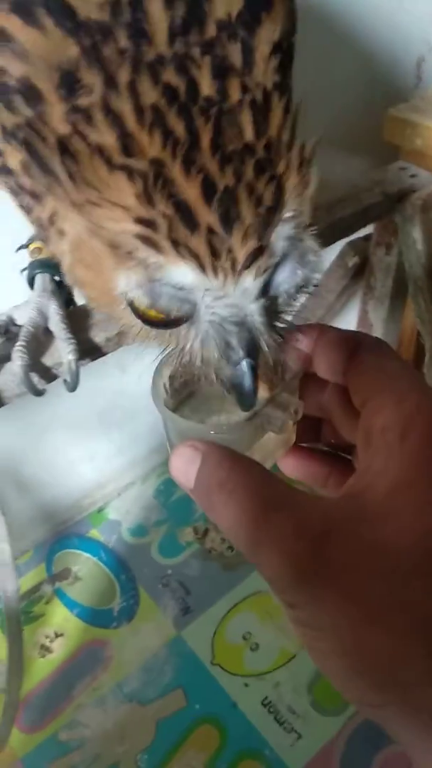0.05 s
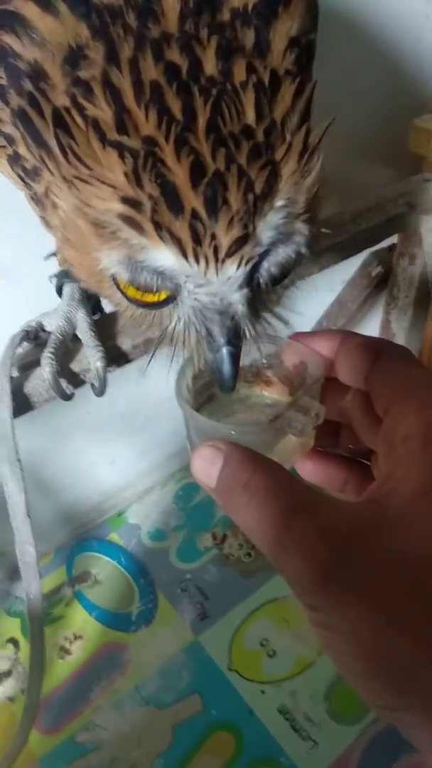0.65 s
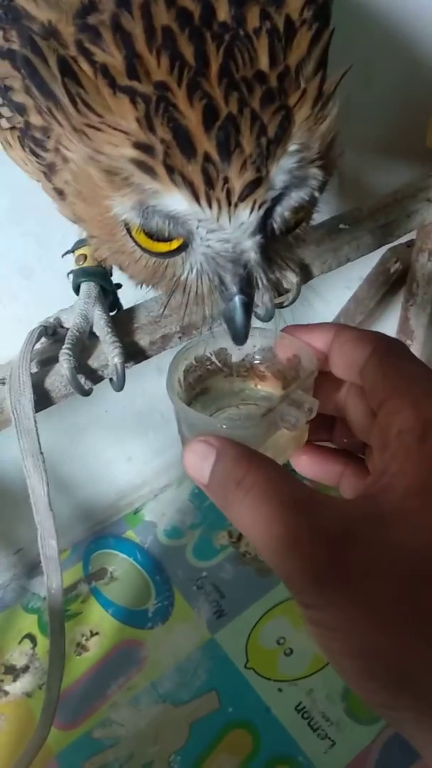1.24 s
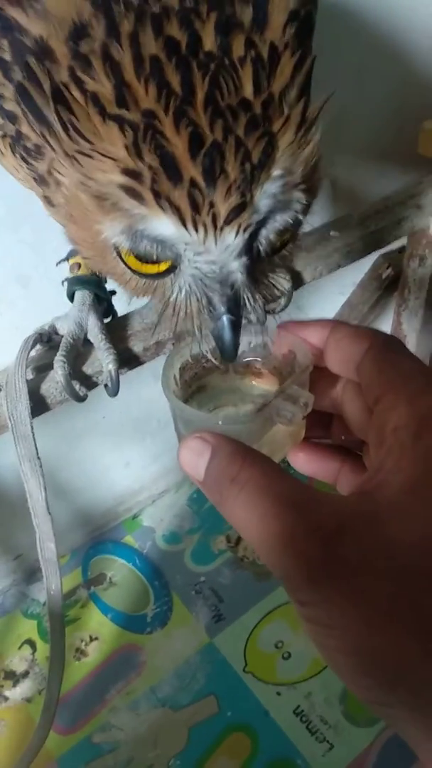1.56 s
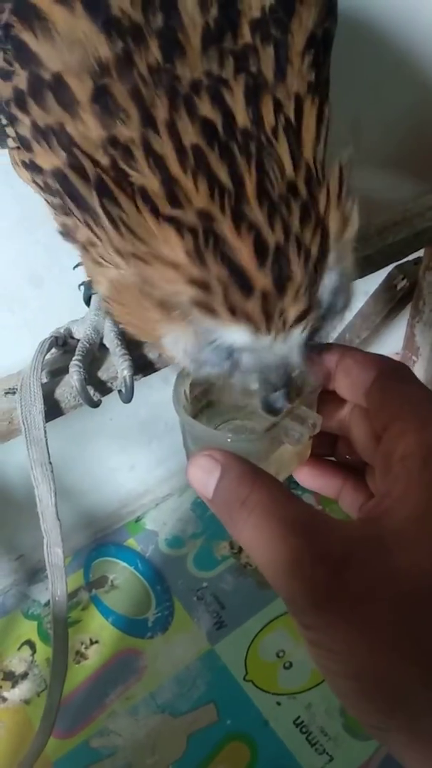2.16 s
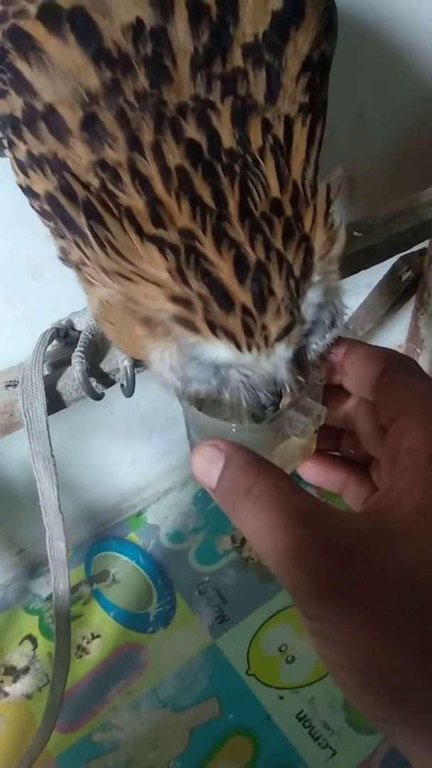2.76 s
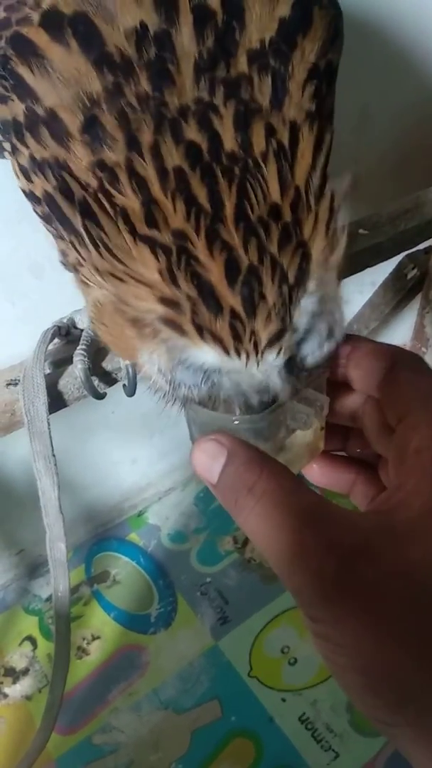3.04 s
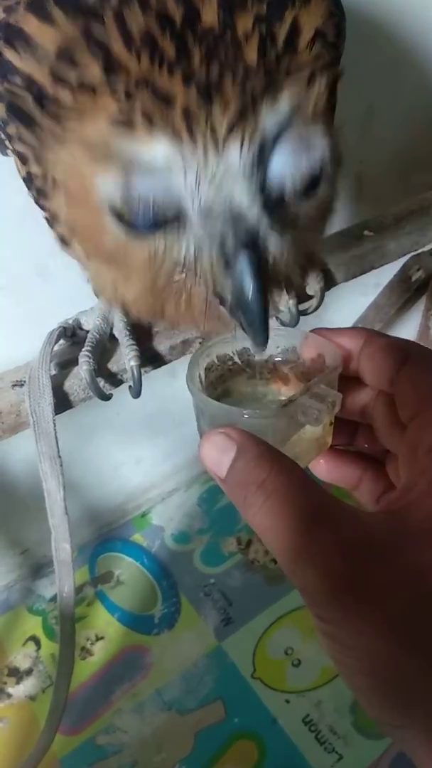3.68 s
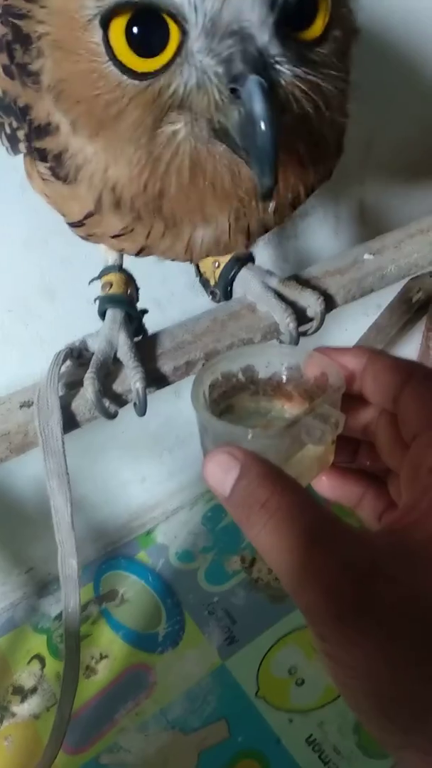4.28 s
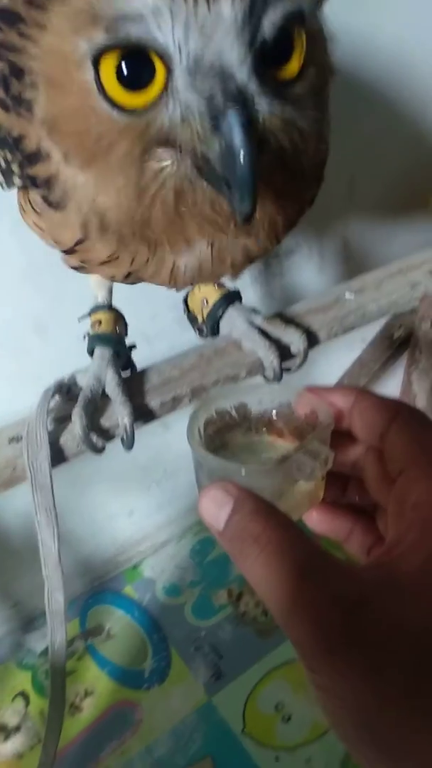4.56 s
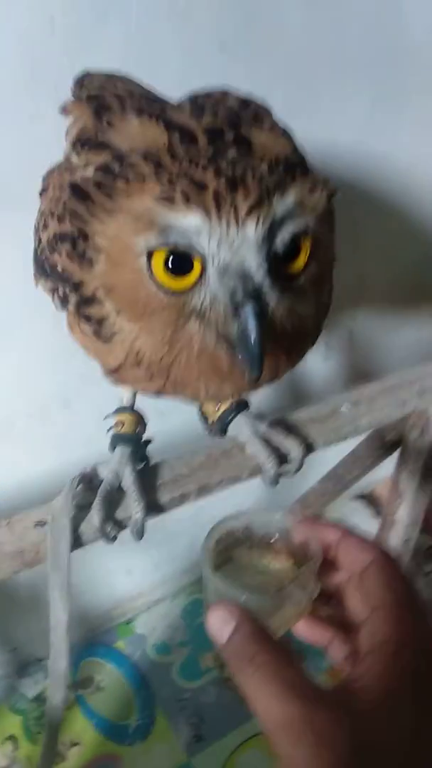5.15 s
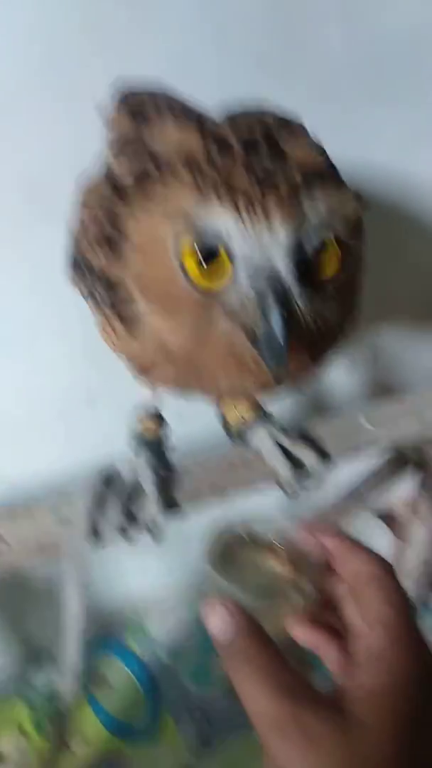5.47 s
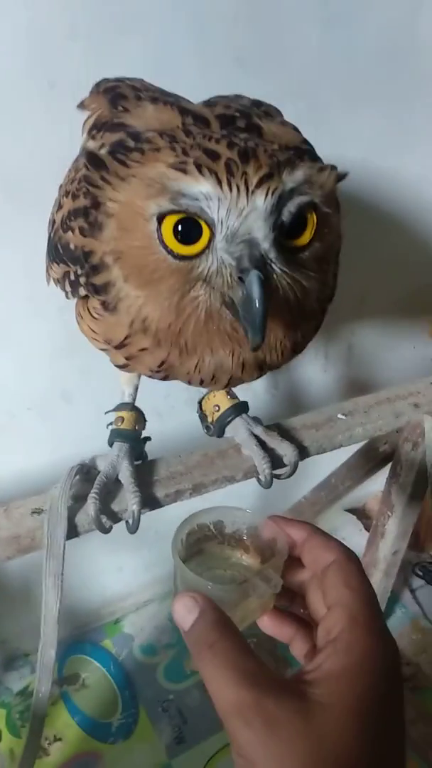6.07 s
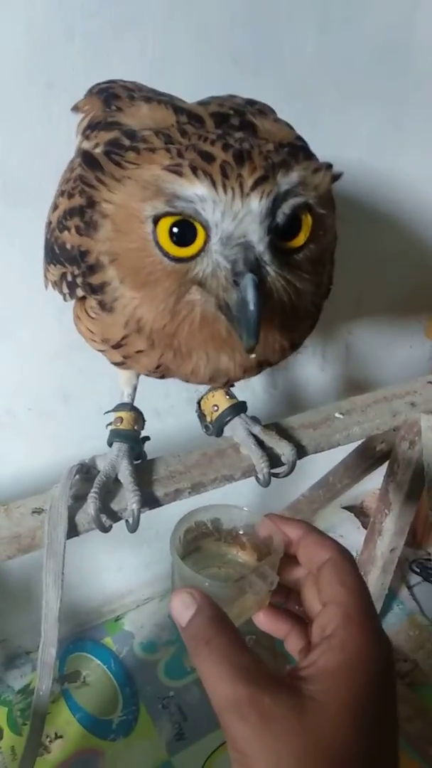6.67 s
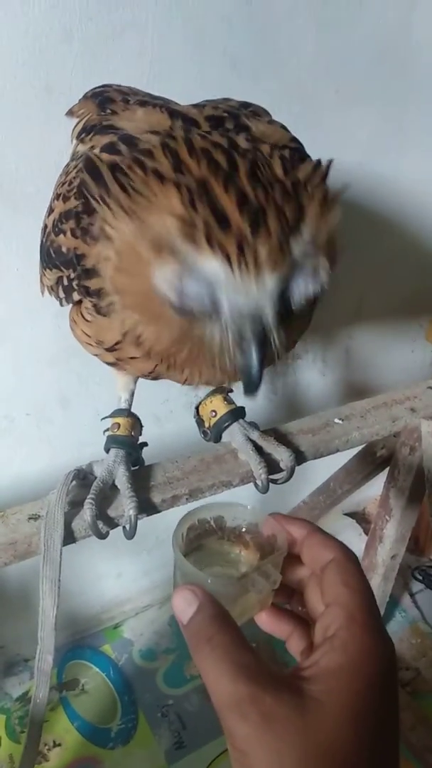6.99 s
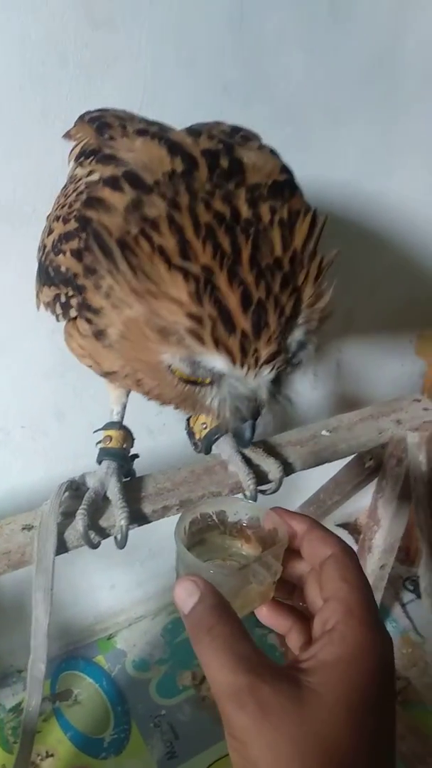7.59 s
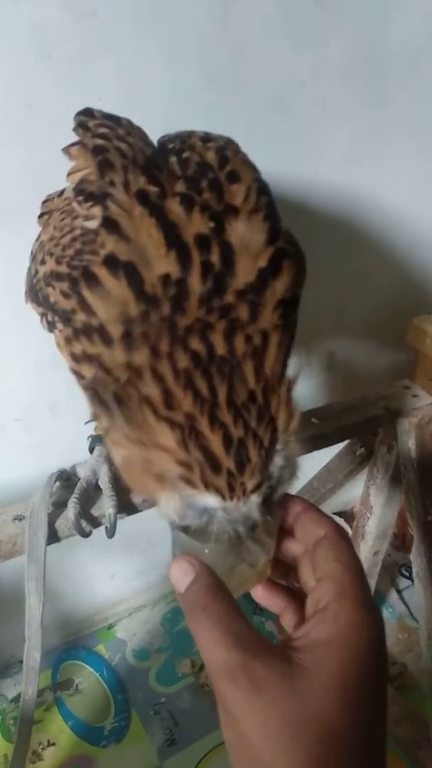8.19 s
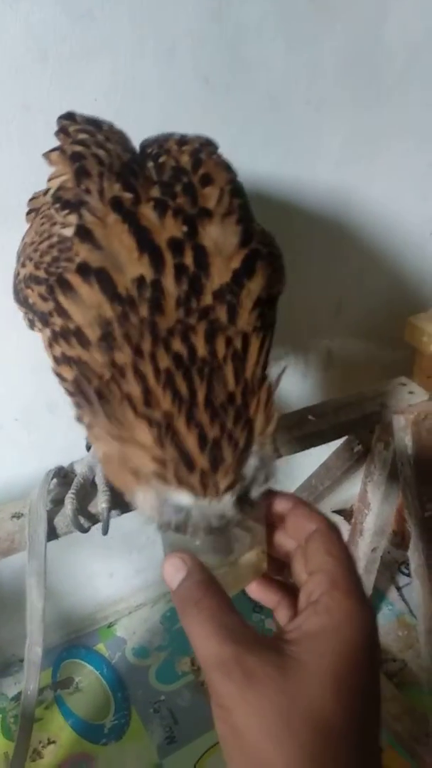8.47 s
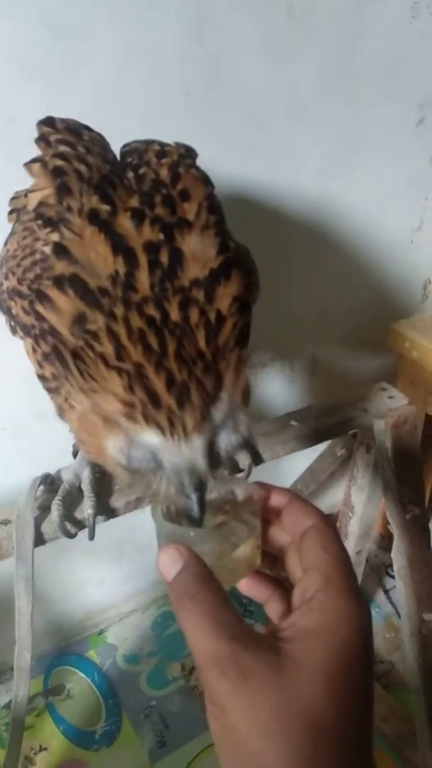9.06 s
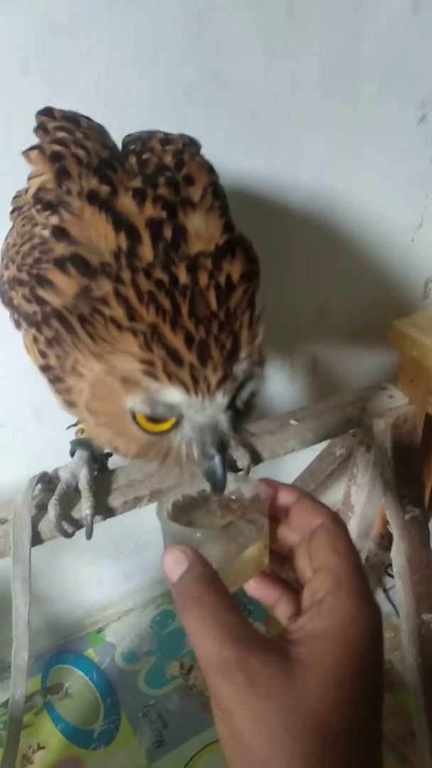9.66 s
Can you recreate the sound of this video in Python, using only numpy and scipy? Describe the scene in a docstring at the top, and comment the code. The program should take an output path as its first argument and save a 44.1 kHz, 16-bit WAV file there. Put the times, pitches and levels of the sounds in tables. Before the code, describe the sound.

An owl sips water from a plastic cup, its wet beak smacking and tapping on the rim, with soft wheezy breaths and faint swallows. Three times it gives a high, hissy whistle that rises in pitch, the later two louder, and the sipping carries on between them. An electric fan hums faintly behind. The microphone is close, in a small room with bare walls.

```python
"""A tame owl begs with three rising, hissy whistles, blown by an air jet in its syrinx. Between them it sips
from a hand-held plastic cup: films of water burst, the wet beak smacks, taps and scrapes the cup, and swallows
and soft low rustles ring the throat. Breath through the narrow throat wheezes and hisses softly. An electric
fan hums behind, and the bare walls of the small room reflect every sound."""
import sys
import numpy as np
from scipy import signal
from scipy.fft import rfft, irfft, next_fast_len
from scipy.io import wavfile
from scipy.ndimage import uniform_filter1d

SR = 44100
rng = np.random.default_rng(int(sys.argv[2]) if len(sys.argv) > 2 else 0)


def bounce(signal):
    """Save signal as a 16-bit WAV file at the path given by the first command-line argument."""
    frames = np.transpose(np.atleast_2d(signal))
    limited = np.clip(frames, -1, 1)
    pcm = np.round(limited * 32767).astype(np.int16)
    wavfile.write(sys.argv[1], SR, pcm)


N = 433503
T = np.arange(N) / SR


def undb(db):
    """Decibels to amplitude ratio."""
    return 10 ** (np.asarray(db) / 20)


def unit(x):
    """Normalise to rms 1."""
    return x / np.sqrt(np.mean(np.abs(x) ** 2))


def colour(x, points):
    """Spectral shaping by points of (frequency [Hz], gain [dB])."""
    hz, db = np.transpose(points)
    size = next_fast_len(x.shape[-1] + 256)
    f = np.maximum(np.arange(size // 2 + 1) * SR / size, 1)
    gain = undb(np.interp(np.log(f), np.log(hz), db))
    return irfft(rfft(x, size) * gain, size)[..., :x.shape[-1]]


def flutter(size, width_hz):
    """Narrow-band noise: the complex envelope of a randomly driven resonance."""
    pole = np.exp(-np.pi * width_hz * np.sqrt(2) / SR)
    lead = SR // 10
    z = rng.standard_normal(size + lead) + 1j * rng.standard_normal(size + lead)
    return unit(signal.lfilter([1], [1, -2 * pole, pole ** 2], z)[lead:])


def waver(size, width_hz):
    """Random modulation: real low-pass noise of rms 1."""
    return unit(flutter(size, width_hz).real)


def phasor(hz):
    """Unit oscillation whose phase is the integral of frequency."""
    return np.exp(2j * np.pi * np.cumsum(hz) / SR)


def resonance(hz, width_hz):
    """A noise-driven resonance along a frequency curve, at rms 1."""
    return unit((phasor(hz) * flutter(len(hz), width_hz)).real)


def unit_onset(x):
    """Normalise a transient by its first 5 ms."""
    return x / np.std(x[:SR // 200])


def pan(left_minus_right_db):
    """Channel gains for a level difference."""
    return undb(np.array([[left_minus_right_db], [-left_minus_right_db]]) / 2)


def add(out, start_s, x):
    """Superpose x on out."""
    i = max(int(start_s * SR), 0)
    out[..., i:i + x.shape[-1]] += x[..., :max(N - i, 0)]


def fan(rush_db=-47.5, waver_db=1):
    """Tonal and broadband fan noise: drifting mains and blade lines over a rush of air."""
    # fan and motor lines: (frequency [Hz], width [Hz], level [dB])
    hum_lines = [(99.5, 0.53, -50), (96.3, 7.13, -55.5), (111.9, 1, -56.5), (150.7, 0.99, -64.5),
                 (249.5, 0.91, -66.5), (289, 3.75, -53.5), (353, 5.66, -65), (536, 2.84, -68.5),
                 (4040, 36, -68.5)]
    # rush of air: (frequency [Hz], relative spectral density [dB])
    air_spectrum = [(18, -75), (30, -54), (70, -7.5), (79, -7.5), (100, -5.5), (131, -7.5), (259, -11.5),
                    (287, -5.5), (437, -13), (740, -14.5), (2170, -21.5), (3580, -24), (4300, -27),
                    (10800, -23), (16000, -33)]
    # the bass is alike on both sides: (frequency [Hz], side minus mid [dB])
    side_spectrum = [(60, -12), (200, -13), (380, -7.5), (700, -3), (1300, 0.5), (16000, 0.5)]
    hum, knots = 0, T[::441]
    for hz, width, db in hum_lines:
        drift = unit(uniform_filter1d(rng.standard_normal(len(knots)), size=6))
        line = phasor(hz + width * np.interp(T, knots, drift) / 2).imag
        hum = hum + undb(db) * np.sqrt(2) * line
    mid, side = unit(colour(rng.standard_normal((2, N)), air_spectrum))
    rush = mid + colour(side, side_spectrum) * np.array([[1], [-1]])
    return hum + undb(rush_db + waver_db * waver(N, 6.2)) * rush


def snap(beak_hz, hold_s, t60_s, rise_s, crackle_db, body_db, crack_s=0.00066, width_hz=1000):
    """Impulse excitation: a crack and a short crackle ring the hard horn of the beak."""
    # beak click: (frequency [Hz], gain [dB])
    click_spectrum = [(150, -11), (900, -12.5), (2200, 3), (3500, -0.5), (4800, -0.5), (7500, -3),
                      (10000, -7), (13000, -5.5), (15000, -10), (16000, 0)]
    t = T[:SR // 10]
    grains = unit(rng.standard_normal(len(t)) * undb(4 * waver(len(t), 1100)))
    crackle = grains * undb(crackle_db - 60 * np.maximum(t - hold_s, 0) / t60_s)
    crack = rng.standard_normal(len(t)) * np.exp(-t / crack_s)
    burst = (crack + crackle) * (1 - np.exp(-t / rise_s))
    click = colour(colour(burst, click_spectrum), [(5300, body_db), (8300, 0)])
    horn = signal.lfilter(*signal.iirpeak(beak_hz, beak_hz / width_hz, fs=SR), click)
    return unit_onset(click + undb(5) * horn)


def smacks(width_hz=250, mouth_t60_s=0.027, octave_db=-4):
    """Cavity resonance: the wet beak parts with a drawn-out crackle that rings the mouth."""
    # smacks: (time [s], level [dB], crackle hold [s], body re treble [dB], mouth resonance [Hz],
    # mouth re crackle [dB], beak resonance [Hz], left minus right [dB])
    partings = [(0.0416, -36.5, 0.0032, -5, 9560, 5.5, 9250, -4),
                (0.5765, -24, .005, -15.5, 2160, -14.5, 9700, -4),
                (0.744, -38, .002, -8, 1560, -1, 6040, 0),
                (0.9157, -22.5, .005, -11, 1970, -17, 10800, -3.5),
                (1.103, -35.5, 0.0023, -13, 2350, -19, 9700, -2),
                (1.305, -23.5, 0.0048, -10, 2020, -18, 10000, -3),
                (1.516, -33.5, 0.0017, -16, 9900, -15, 10600, -4),
                (3.517, -38, 0.0022, 1, 3120, -10, 9500, -4), (3.6486, -22, .002, -7, 3190, -12, 11800, 2),
                (3.9463, -20.5, 0.0039, -12, 2240, -21, 10300, -1),
                (4.249, -34, 0.0025, -4, 3880, -5.5, 4500, 3),
                (4.346, -23, 0.0038, -22.5, 5200, -20, 9700, -3), (8.13, -51, .002, -3, 2720, -1, 9500, 1),
                (8.678, -30, 0.0025, -9, 3150, -7.5, 10900, -4),
                (9.31, -26.5, 0.0022, -19, 2680, -19, 8600, -2),
                (9.477, -36, .002, -15, 2970, -22, 10300, 0),
                (9.719, -22.5, .003, -9.5, 7180, -9, 11000, -0.5)]
    out = np.zeros((2, N))
    t = T[:SR // 10]
    for start, db, hold_s, body_db, mouth_hz, mouth_db, beak_hz, pan_db in partings:
        lower = resonance(np.full(len(t), mouth_hz), width_hz)
        upper = resonance(np.full(len(t), 2 * mouth_hz), width_hz)
        mouth = unit_onset((lower + undb(octave_db) * upper) * undb(-60 * t / mouth_t60_s))
        crackle = snap(beak_hz, hold_s, t60_s=0.01, rise_s=0.002, crackle_db=-1, body_db=body_db)
        add(out, start, undb(db) * pan(pan_db) * (crackle + undb(mouth_db) * mouth))
    return out


def taps(detune=0.023):
    """Impact on the cup: the beak snaps sharply and the plastic knocks in damped modes."""
    # taps: (time [s], relative snap level [dB], knock level [dB], beak resonance [Hz],
    # left minus right [dB])
    impacts = [(.157, -23.5, -36.5, 9970, -2), (.392, -25, -33.5, 9500, -5), (.693, -25, -36, 6250, -5),
               (2.42, -30.5, -37, 2300, 6), (3.1978, -21.5, -30.5, 2720, 1), (3.4802, -23, -33.5, 9600, -3),
               (3.745, -24, -38, 12000, -5), (4.115, -33.5, -49, 9700, -6), (9.087, -31, -42.5, 10500, 3),
               (9.43, -31, -43.5, 10200, 0)]
    # modes of the cup: (frequency [Hz], relative level [dB], t60 [s])
    cup_modes = [(820, -8, 0.034), (975, 1.5, 0.026), (1245, 7, 0.02), (1540, -8, 0.027),
                 (1770, -22, 0.026)]
    out = np.zeros((2, N))
    t = T[:SR // 10]
    for start, snap_db, knock_db, beak_hz, pan_db in impacts:
        knock = 0
        for hz, db, t60_s in cup_modes:
            mode_hz = hz * (1 + detune * rng.standard_normal())
            knock = knock + undb(db - 60 * t / t60_s) * np.sin(2 * np.pi * mode_hz * t)
        click = snap(beak_hz, hold_s=.0006, t60_s=0.028, rise_s=.0001, crackle_db=-15, body_db=-7.5)
        add(out, start, undb(snap_db - 3) * pan(pan_db) * click)
        add(out, start, undb(knock_db) * unit_onset(knock))
    return out


def rasp(size, depth_db, width_hz=159):
    """Amplitude modulation: the gain of an air stream chopped irregularly by phlegm."""
    return unit(undb(depth_db * waver(size, width_hz)))


def throat_tone(length_s, start_hz, end_hz, width_hz, wander=0.0077, surge_db=1.5, octave_db=-17):
    """Flow-driven resonance of a narrow throat: unsteady pressure moves its pitch and level."""
    size = int(length_s * SR)
    pressure = waver(size, 22)
    hz = np.linspace(start_hz, end_hz, size) * (1 + wander * pressure)
    core = flutter(size, width_hz / 2)
    breathy_fringe = 0.19 * flutter(size, 600)
    jet = phasor(hz) * (core + breathy_fringe) * undb(surge_db * pressure)
    return signal.windows.tukey(size, .5) * (unit(jet.real) + undb(octave_db) * unit((jet ** 2).real))


def hisses(shapes=5, uneven_db=3.5, width_hz=580, upper_db=-1.5):
    """Source and filter: rasping breath passes two gliding throat resonances and a moving mouth."""
    # open-beaked hisses: (start [s], end [s], relative air level [dB], throat level [dB],
    # lower resonance start [Hz], end [Hz], upper resonance start [Hz], end [Hz])
    breaths = [(0.24, 0.361, -50, -50, 2900, 3300, 3500, 3900),
               (0.576, 0.718, -44, -47, 3095, 2900, 4160, 4130),
               (0.686, 0.827, -42, -46, 3920, 3550, 5980, 5300),
               (1.797, 1.995, -41, -40, 5020, 4340, 5340, 5300),
               (1.959, 2.124, -38.5, -40.5, 3130, 2755, 4520, 3790),
               (2.156, 2.517, -43.5, -52, 3790, 3620, 5130, 4910),
               (2.526, 2.685, -48, -45, 4730, 5110, 5150, 5320),
               (2.959, 3.13, -50, -50, 6000, 6130, 9200, 9400),
               (3.288, 3.473, -71, -49, 3620, 3840, 4010, 4400),
               (3.615, 3.783, -35.5, -40.5, 2944, 3116, 5460, 5970),
               (3.781, 3.97, -42.5, -43.5, 5380, 4550, 7200, 6800),
               (3.999, 4.294, -50, -62, 3220, 2950, 4300, 4050),
               (5.088, 5.209, -46.5, -58, 2910, 2700, 3880, 3580),
               (6.286, 6.378, -46.5, -48.5, 3090, 3245, 5240, 5480),
               (6.40, 6.6, -38.5, -46, 3680, 3180, 4670, 4600),
               (6.461, 6.531, -50, -40, 4000, 3050, 4700, 4550),
               (6.53, 6.67, -37, -38, 3036, 3374, 4340, 4440),
               (6.648, 6.75, -45, -50, 3050, 3170, 4500, 4500),
               (6.754, 6.893, -59, -55, 4370, 4370, 5700, 5500),
               (6.867, 7.703, -56, -56, 3200, 3010, 3780, 3600),
               (7.714, 7.854, -39.5, -43, 3430, 3210, 4500, 4250),
               (7.848, 7.961, -43, -44, 2950, 3100, 3690, 3500),
               (7.93, 8.088, -43, -42.5, 3580, 3880, 5900, 5850),
               (9.095, 9.256, -40.5, -47, 2400, 2250, 3240, 3040),
               (9.602, 9.875, -41, -57.5, 2910, 2690, 4520, 4180)]
    # breath noise: (frequency [Hz], gain [dB])
    breath_spectrum = [(1000, -55), (1800, 10.5), (2600, 19.5), (4000, 11), (5200, 12), (6500, 11),
                       (8200, 17.5), (10300, 15.5), (12500, 7), (15500, -3)]
    # windpipe resonances and one deep hollow: (frequency re upper resonance [ratio], gain [dB])
    windpipe = [(.4, -3), (.5, -2), (.6, -1.5), (.75, -4), (.87, 4), (1, -2), (1.08, -12), (1.14, -23),
                (1.24, -12), (1.33, -1.5), (1.49, -0.5), (1.72, -6), (2, 2), (2.2, 0), (2.42, -1.5),
                (2.65, -1), (2.9, -2)]
    out = np.zeros(N)
    mouth_hz = np.geomspace(1500, 15000, 40)
    for start, end, air_db, throat_db, low0, low1, high0, high1 in breaths:
        size = int((end - start) * SR)
        position, air = np.linspace(0, shapes - 1, size), 0
        # beak and tongue move: cross-fade through random mouth shapes
        for k, upper_hz in enumerate(np.linspace(high0, high1, shapes)):
            mouth = np.c_[mouth_hz, uneven_db * rng.standard_normal(len(mouth_hz))]
            share = np.maximum(1 - np.abs(position - k), 0)
            breath = colour(rng.standard_normal(size), breath_spectrum)
            stream = colour(breath, np.array(windpipe) * [upper_hz, 1])
            air = air + np.sqrt(share) * unit(colour(stream, mouth))
        air = undb(air_db - 1) * signal.windows.tukey(size, .7) * unit(air)
        lower = throat_tone(end - start, low0, low1, width_hz)
        upper = undb(upper_db) * throat_tone(end - start, high0, high1, width_hz)
        add(out, start, rasp(size, depth_db=3) * (air + undb(throat_db) * (lower + upper)))
    return out


def wheezes(strand_ratio=.85, strand_db=-16.5):
    """Flow splitting: a thin throat tone and a lower, huskier strand waver independently."""
    # wheezes, beak nearly shut: (start [s], end [s], start pitch [Hz], end pitch [Hz],
    # level [dB], nominal width [Hz])
    breaths = [(0.592, 0.781, 2096, 2030, -44.5, 170), (0.841, 0.997, 2655, 2500, -46.5, 200),
               (.86, 1.244, 2325, 2348, -50, 60), (0.976, 1.15, 2600, 2770, -47.5, 200),
               (1.089, 1.31, 2840, 2780, -44.5, 90), (1.565, 1.715, 3600, 4100, -45, 600),
               (2.538, 2.699, 2656, 2480, -44.5, 190), (2.645, 2.86, 2320, 2320, -45.5, 100),
               (2.733, 2.864, 2950, 3130, -48, 420), (2.822, 3.055, 2790, 2562, -42, 110),
               (2.886, 3.11, 3100, 2905, -42, 280), (3.06, 3.22, 3326, 3310, -44, 160),
               (3.161, 3.33, 2720, 2637, -41, 80), (3.298, 3.5, 2655, 2700, -50.5, 80),
               (3.37, 3.635, 3280, 3390, -50.5, 400), (3.607, 3.768, 2647, 3006, -39.5, 420),
               (3.778, 3.973, 2454, 2203, -41, 110), (4.04, 4.153, 1850, 1990, -48.5, 350),
               (6.232, 6.382, 2600, 3180, -46, 330), (6.405, 6.518, 2150, 2404, -44, 220),
               (6.857, 7.015, 3720, 3660, -48.5, 402), (6.986, 7.2, 3490, 3830, -50.5, 550),
               (7.214, 7.435, 3730, 3420, -49.5, 650), (7.404, 7.708, 3240, 3550, -52, 800),
               (7.688, 7.815, 2776, 2760, -45, 400)]
    out = np.zeros(N)
    for start, end, hz0, hz1, db, width in breaths:
        main = throat_tone(end - start, hz0, hz1, width)
        strand = throat_tone(end - start, hz0 * strand_ratio, hz1 * strand_ratio, width * 1.5)
        add(out, start, undb(db) * (main + undb(strand_db) * strand))
    return out


def scrapes(centre_hz=1320, width_hz=450):
    """Friction noise: the beak drags on the wall of the cup with a short, dull rub."""
    # scrapes: (start [s], end [s], level [dB])
    drags = [(0.729, 0.805, -45), (8.319, 8.369, -35.5)]
    out = np.zeros(N)
    for start, end, db in drags:
        size = int((end - start) * SR)
        rub = resonance(np.full(size, centre_hz), width_hz)
        add(out, start, undb(db) * signal.windows.tukey(size, .5) * rub)
    return out


def swallows_and_rustles(width_hz=280, fall=0.404, decay_s=0.0448, rise_s=0.002):
    """Damped resonance: the throat rings dully and sinks in pitch, in swallows and soft low rustles."""
    # swallows and soft low rustles: (time [s], relative level [dB], mid-glide pitch [Hz])
    throat_sounds = [(.798, -44, 432), (1.328, -45, 476), (3.232, -41, 370.4), (4.149, -48.5, 492),
                     (4.271, -47.5, 407), (5.16, -44.5, 439), (5.876, -45, 392.5), (6.353, -46, 335.6),
                     (8.037, -40, 364.4), (9.16, -45, 419), (9.54, -47, 383)]
    out = np.zeros(N)
    t = T[:SR // 5]
    attack, decay = 1 - np.exp(-t / rise_s), np.exp(-t / decay_s)
    for start, db, hz in throat_sounds:
        throat = resonance(hz * (1 + fall * (decay - .5)), width_hz)
        add(out, start, undb(db) * throat * attack * decay)
    return colour(out, [(60, -11), (250, 2.5)])


def whistle(curve, core_hz=115, fringe_hz=340, jitter_hz=35, sputter_db=4, hiss_db=-31.5,
            attack_s=.06, release_s=0.085, octave_edge_hz=15100):
    """Self-sustained oscillation: a jet in the syrinx sounds a turbulent tone and octave amid hiss."""
    # breath noise round the whistle: (frequency [Hz], gain [dB])
    hiss_spectrum = [(1500, -15), (3000, -10), (4800, -6), (5450, 4.5), (7400, 7.5), (8500, 6), (9800, 0),
                     (11200, 2.5), (12800, -9), (14500, -8), (15800, -17)]
    times, *columns = np.transpose(curve)
    t = np.arange(times[0], times[-1], 1 / SR)
    size = len(t)
    hz, db, roughness = (np.interp(t, times, column) for column in columns)
    steady, rough = np.sqrt(1 - roughness), np.sqrt(roughness)
    carrier = phasor(hz + jitter_hz * waver(size, 59.5))
    # the rougher the jet, the less steady tone is left and the wider the line grows
    turbulence = steady * flutter(size, core_hz) + rough * flutter(size, fringe_hz)
    jet = carrier * (steady + rough * turbulence)
    jet = jet / np.sqrt(1 + np.abs(jet) ** 2 / 2)  # the oscillation saturates
    sputter = unit(undb(sputter_db * rough * np.tanh(waver(size, 80))))
    flow = np.minimum((t - t[0]) / attack_s, 1) * np.minimum((t[-1] - t) / release_s, 1)
    breath = unit(colour(rng.standard_normal(size), hiss_spectrum)) * rasp(size, depth_db=1.5)
    # the octave is capped in level, fades past its edge and frays more than the note
    octave_db = np.minimum(db - 4.5, -34) - 0.02 * np.maximum(2 * hz - octave_edge_hz, 0)
    octave = jet ** 2 * (1 + 0.55 * flutter(size, 450))
    tone = undb(db + 3) * unit(jet.real) + undb(octave_db) * unit(octave.real)
    return sputter * tone + flow * undb(hiss_db) * breath


def sigh(start_hz=5500, end_hz=4650, length_s=.08, level_db=-41, width_hz=240):
    """Falling resonance: as the throat relaxes, a husky tone slides down ever faster."""
    along = np.linspace(0, 1, int(length_s * SR))
    hz = start_hz + (end_hz - start_hz) * along ** 2.2
    tone = phasor(hz) * (0.37 + flutter(len(along), width_hz))
    return undb(level_db) * signal.windows.tukey(len(along), .7) * unit(tone.real)


def begging_calls(overlap_s=0.066):
    """Frequency glides: each whistle rises, then runs out in a short falling sigh."""
    # one curve a call; where the jet locks it steps up, pure and loud:
    # (time [s], pitch [Hz], relative level [dB], roughness [0-1])
    curves = [
        [(1.66, 6500, -55, .3), (1.685, 7050, -42, .3), (1.735, 7000, -31, .3), (1.765, 7200, -25, .15),
         (1.79, 7260, -22.5, .1), (1.87, 7380, -25, .4), (1.97, 7520, -26, .6), (2.02, 7700, -30, .9),
         (2.08, 8050, -35, .95), (2.14, 8000, -50, .95)],
        [(5.262, 6600, -52, .3), (5.28, 6780, -35, .3), (5.311, 6850, -26, .4), (5.338, 6880, -26, .5),
         (5.365, 7100, -21.5, .4), (5.425, 7200, -24.5, .5), (5.48, 7170, -20.5, .4), (5.505, 7200, -27, .6),
         (5.525, 7170, -23, .5), (5.565, 7250, -31, .7), (5.571, 7480, -17.5, .1), (5.6, 7600, -22, .5),
         (5.665, 7680, -25, .8), (5.728, 7900, -44, .9)],
        [(8.347, 5950, -50, .2), (8.356, 6300, -34, .2), (8.375, 6650, -27, .3), (8.4, 6780, -25, .4),
         (8.411, 6950, -14.5, .05), (8.443, 7010, -14, .05), (8.478, 7070, -23, .4), (8.492, 7070, -14.5, .1),
         (8.505, 7100, -22, .5), (8.6, 7200, -21, .6), (8.65, 7380, -19.5, .5), (8.72, 7500, -22, .35),
         (8.745, 7520, -31, .8), (8.79, 7450, -46, .9)],
    ]
    out = np.zeros(N)
    for curve in curves:
        add(out, curve[0][0], whistle(curve))
        add(out, curve[-1][0] - overlap_s, sigh())
    return out


def sips(bursts_per_s=900, spread_db=3, grain_s=0.0012, surge_db=2):
    """Shot noise: tiny films of water burst round the beak in a dense, surging crackle."""
    # the beak working in the water: (start [s], end [s], level [dB])
    spells = [(2.148, 3.34, -47.5), (3.303, 4.105, -46.5), (6.355, 6.795, -46), (7.695, 8.206, -44)]
    # wet crackle: (frequency [Hz], gain [dB])
    wet_spectrum = [(800, -43), (2500, 16.5), (5500, 7), (8000, 7.5), (10000, 14), (15500, -5)]
    out = np.zeros(N)
    decay = np.exp(-T[:SR // 100] / grain_s)
    for start, end, db in spells:
        size = int((end - start) * SR)
        bursts = rng.random(size) < bursts_per_s / SR
        strength = undb(spread_db * np.minimum(rng.exponential(size=size), 4))
        grains = signal.fftconvolve(bursts * strength, decay)[:size] * rng.standard_normal(size)
        crackle = colour(grains * undb(surge_db * waver(size, 4.3)), wet_spectrum)
        add(out, start, undb(db) * unit(crackle) * signal.windows.tukey(size, .4))
    return out


def room(x, early_db, early_s, tail_db, t60_s, treble_t60_ratio=0.78):
    """Reverberation: early reflections off wall and table, then a tail that loses its treble first."""
    t = T[:SR // 2]
    reflections = unit(rng.standard_normal((2, len(t))) * np.exp(-t / early_s) * (t > .001))
    near = undb(early_db) * reflections / np.sqrt(2 * len(t))
    near[0, 0] += 1  # mid and side; the direct sound is in the mid
    power = np.sum(near ** 2, axis=1, keepdims=True)
    for _ in range(4):  # flat walls favour no band: even out the power over a few hundred hertz
        spectrum = rfft(near)
        band_power = uniform_filter1d(np.abs(spectrum) ** 2, size=140, axis=1)
        near = irfft(spectrum * np.sqrt(power / band_power), len(t)) * (t < .1)
    diffuse = rng.standard_normal((2, len(t)))
    low = colour(diffuse, [(7000, -1.5), (11000, -36), (15000, -19)])
    treble = (diffuse - low) / 2
    decay_db = -60 * t / t60_s
    tail = (low * undb(decay_db) + treble * undb(decay_db / treble_t60_ratio)) * (t > .008)
    early = near[0] + near[1] * np.array([[1], [-1]])
    response = early + undb(tail_db) * unit(tail) / np.sqrt(len(t))
    return signal.fftconvolve(np.broadcast_to(x, (2, N)), response, axes=1)[:, :N]


def scene(left_lag_s=0.0002):
    """Direct and reflected sound: the voice arrives largely off the walls, the clicks more directly."""
    voice_and_sips = begging_calls() + wheezes() + hisses() + sips() + scrapes()
    owl = undb(-8.5) * room(voice_and_sips, early_db=6.5, early_s=0.0081, tail_db=-3.5, t60_s=0.43)
    left, right = smacks() + taps()
    clicks = np.array([np.roll(left, int(left_lag_s * SR)), right])  # the beak is to the right
    beak = room(clicks, early_db=-1.5, early_s=0.0013, tail_db=-6, t60_s=0.33)
    throat = room(swallows_and_rustles(), early_db=-1, early_s=0.0063, tail_db=-27, t60_s=1.0)
    return owl + beak + throat + fan()


def record(dry, cutoff_hz=16000):
    """Frequency response: the left microphone port is duller than the right; the top is cut steeply."""
    # imbalance of the ports: (frequency [Hz], left minus right [dB])
    imbalance = [(100, 0), (1200, 0.5), (2400, 4), (5000, 0), (8000, 0), (10500, -7.5), (15000, -7)]
    left = colour(dry[0], [(hz, db / 2) for hz, db in imbalance])
    right = colour(dry[1], [(hz, -db / 2) for hz, db in imbalance])
    low_pass = signal.firwin(161, cutoff_hz, fs=SR)
    return signal.fftconvolve(np.array([left, right]), low_pass[None], mode="same", axes=1)


dry = scene()
out = record(dry)
bounce(out)
```